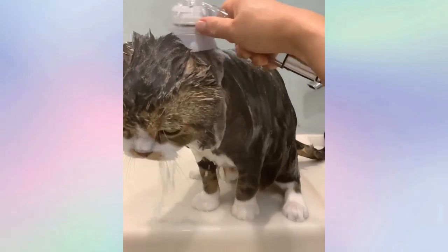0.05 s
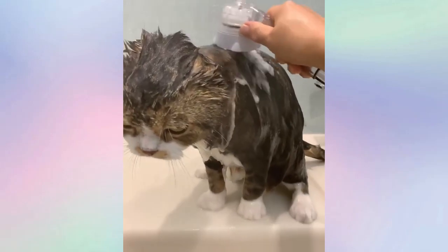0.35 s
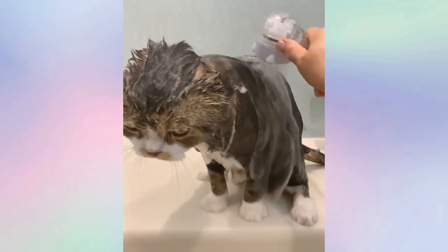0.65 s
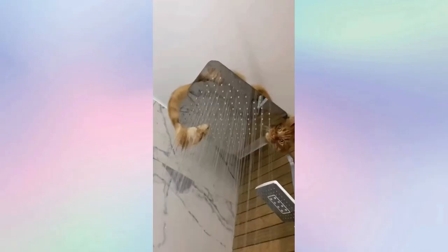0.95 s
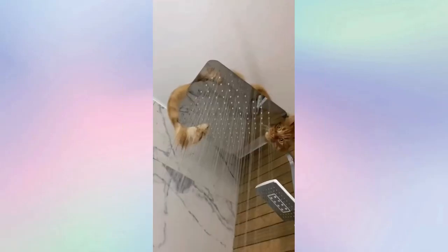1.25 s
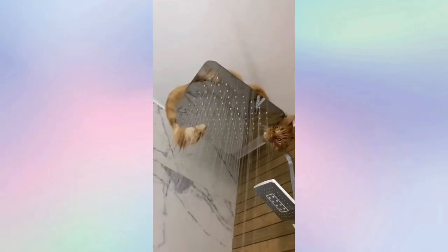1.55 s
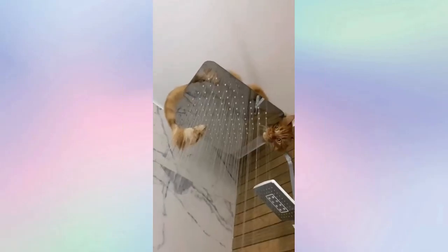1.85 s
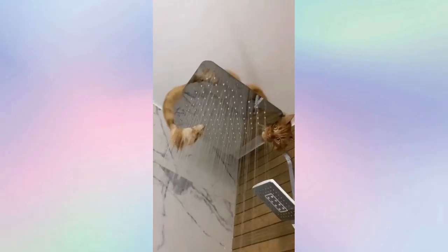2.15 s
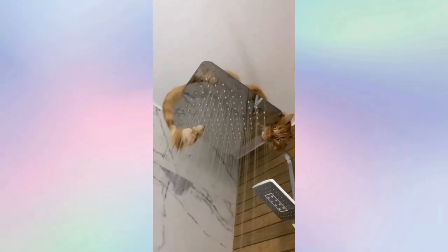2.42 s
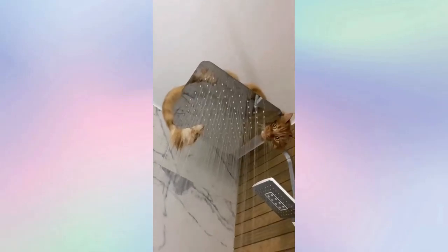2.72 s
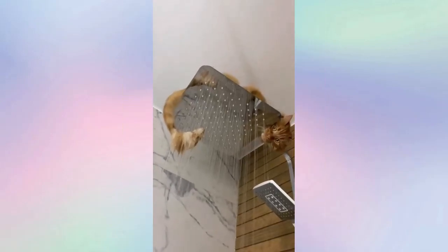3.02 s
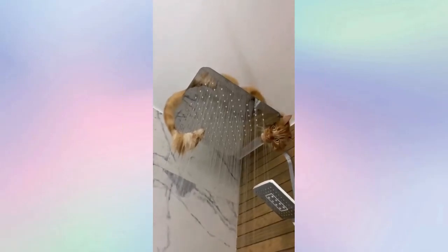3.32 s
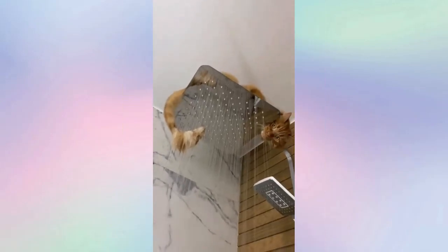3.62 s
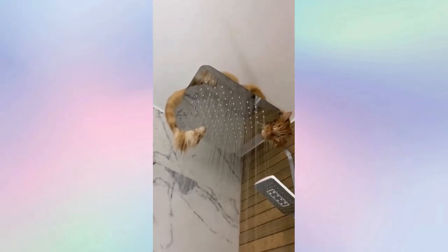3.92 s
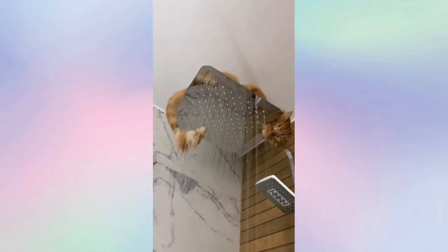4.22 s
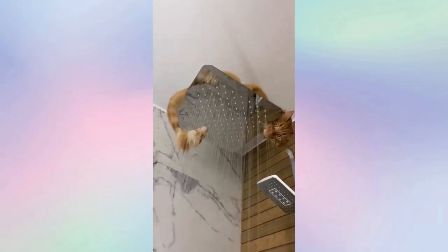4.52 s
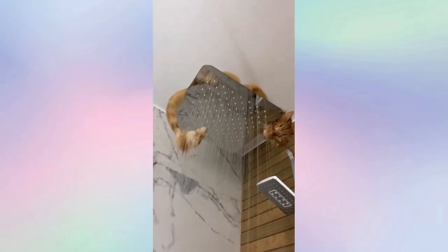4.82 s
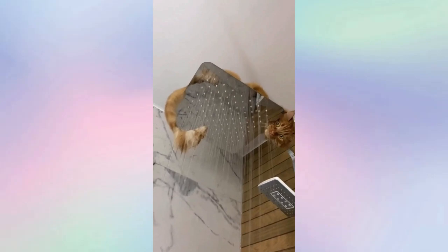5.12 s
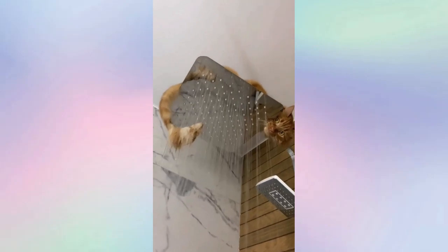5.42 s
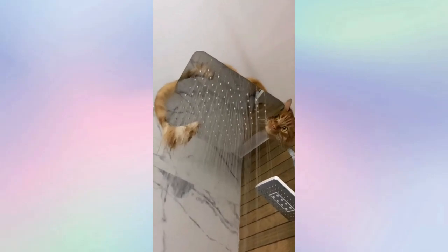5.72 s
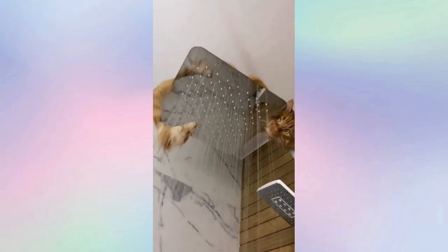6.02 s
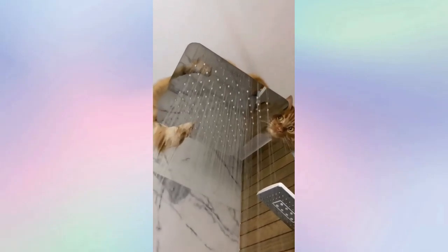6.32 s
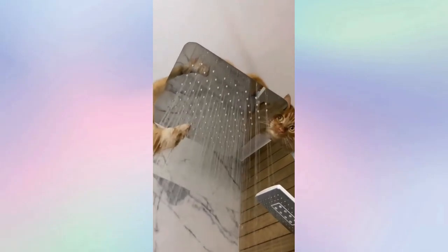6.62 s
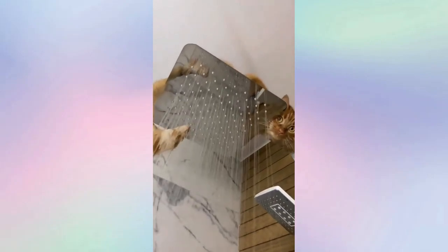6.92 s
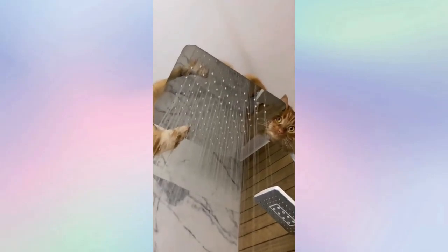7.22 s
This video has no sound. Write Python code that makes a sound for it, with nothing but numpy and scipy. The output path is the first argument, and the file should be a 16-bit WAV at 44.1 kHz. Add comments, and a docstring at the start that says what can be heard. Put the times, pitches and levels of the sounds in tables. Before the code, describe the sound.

A handheld sprayer hisses close by on a cat's wet fur while the run-off drums in a sink. It stops dead after about half a second, and one dry tick sounds in the short silence. Then an overhead shower cuts in and runs steadily, with bright spray, dense patter on the floor and small splashes in standing water. The bathroom stall rings hollow underneath, with a low boom and soft thuds.

```python
"""Two showers in turn

A hand sprayer hisses over a cat's back while the run-off drives the resonances of a sink. After a short
silence with one tick, an overhead shower rains on a bathroom floor. Its many drop impacts add up to
a surging noise, and air bubbles trapped in the standing water ring as small oscillators. Beneath them
the falling water excites the modes of floor and stall: a hollow ring, a low boom and soft thuds."""
import sys
import numpy as np
from scipy import signal
from scipy.fft import rfft, irfft, next_fast_len
from scipy.io import wavfile
from scipy.ndimage import uniform_filter1d, map_coordinates

SR = 44100
rng = np.random.default_rng(int(sys.argv[2]) if len(sys.argv) > 2 else 0)


def int16_out(signal):
    """Quantize to a 16-bit WAV file."""
    q = np.round(np.clip(np.atleast_2d(signal).T, -1, 1) * 32767)
    wavfile.write(sys.argv[1], SR, q.astype(np.int16))


N = 324576
SPRAYER_END_S, SHOWER_START_S = 0.567, 0.8215

# Levels in the tables are relative; each source adds its own gain.
# flow of the overhead shower: (time [s], patter level [dB], spray level [dB])
SHOWER_FLOW = [(0.83, -36, -35), (1.03, -34.5, -36), (1.05, -34, -31.5), (1.44, -34, -33), (1.48, -38, -34),
               (1.55, -33.5, -33), (1.68, -35.5, -32.5), (2.06, -32.5, -32), (2.26, -37, -32.5),
               (2.33, -32, -31.5), (2.39, -36.5, -33), (3.04, -35.5, -33.5), (3.11, -35, -34.5),
               (3.3, -31.5, -30.5), (3.31, -34, -31), (3.84, -34.5, -31), (3.87, -35, -34),
               (4.22, -34, -30), (4.24, -37.5, -33), (4.33, -36, -35.5), (4.71, -32, -30),
               (4.76, -34.5, -34), (4.93, -34, -30.5), (4.98, -35.5, -33), (5.07, -34, -32.5),
               (5.87, -35, -33.5), (6.41, -35, -33.5), (6.76, -36.5, -33.5), (6.98, -33.5, -33),
               (7.05, -38, -33.5), (7.1, -34, -32), (7.34, -35.5, -31.5)]
# gushes into the puddle: (start [s], length [s], level [dB])
GUSHES = [(1.31, 0.031, -43), (1.37, 0.021, -46.5), (1.47, 0.056, -42.5), (1.87, 0.062, -43),
          (1.97, 0.045, -43.5), (2.18, 0.022, -41), (2.27, 0.063, -42), (2.68, 0.049, -48.5),
          (2.98, .03, -44), (3.43, 0.046, -43), (3.6, .02, -39.5), (3.7, 0.038, -47), (3.925, .02, -46),
          (3.98, .035, -46), (4.3, .045, -44.5), (4.67, 0.037, -44), (4.87, 0.085, -42), (5.13, .025, -49),
          (5.36, .02, -46), (5.55, 0.041, -42.5), (5.79, 0.03, -45), (6.0, .03, -50), (6.29, 0.053, -51),
          (6.96, .02, -44), (7.27, 0.022, -42)]
# flow of the hand sprayer: (time [s], jet level [dB], fur level [dB], sink level [dB])
SPRAYER_FLOW = [(0.0, -39, -52, -33), (0.022, -39.5, -48.5, -37), (0.238, -39, -50, -36.5),
                (0.39, -36.5, -39.5, -34.5), (0.432, -39, -41, -35.5), (0.56, -36.5, -39.5, -35.5)]
# impulses of the tick's two edges and of heavy lumps of water: (time [s], level [dB])
TICK_EDGES = [(0.681, -36), (0.6824, -16.5)]
THUD_BLOWS = [(1.145, 17.5), (1.581, 13), (1.86, 13.5), (2.082, 14), (2.228, -3), (2.44, 14), (2.788, 12),
              (3.3, 13), (3.588, 15), (4.298, 16.5), (5.129, 16), (5.318, 5), (6.732, -4)]
# spectral envelopes: (frequency [Hz], level [dB])
SPRAY_SPECTRUM = [(2500, -17.5), (5000, -17), (7200, -42), (8500, -2.5), (9400, -4.5), (10000, -2.5),
                  (12400, 1.5), (13100, -3.5)]
PATTER_SPECTRUM = [(700, -38), (1850, -12), (2450, -10), (2800, -9), (3400, -2), (4400, -1.5), (6000, -0.5),
                   (7300, -3), (9000, -1), (13000, -11.5)]
PUDDLE_SPECTRUM = [(500, -18), (1200, -6.5), (1550, -2), (1900, -8.5), (2400, -3), (2800, -2), (3300, 1),
                   (4200, -1), (9000, -45)]
GUSH_SPECTRUM = [(700, -26), (1300, -5.5), (1550, -4.5), (1950, -3.5), (2450, 4), (3200, -12), (5000, -24)]
JET_SPECTRUM = [(1500, -29), (3200, -13), (4000, -3), (5100, -7.5), (6200, 1.5), (8000, 0.5), (10300, 3),
                (11500, -4.5), (12400, -5), (13100, -19.5)]
FUR_SPECTRUM = [(20, -19.5), (60, -0.5), (500, -12), (1300, -1), (2300, 6), (4000, 6), (5200, -1.5),
                (9000, -30)]
WASH_SPECTRUM = [(20, -39), (45, -37), (65, 7), (160, 8), (450, 3), (700, 3.5), (1000, 4), (1500, -9),
                 (3000, -13)]
TICK_SPECTRUM = [(200, -26), (2000, -11), (5000, 1.5), (13000, -8)]
SOFT_CONTACT = [(70, -5), (140, -10), (213, 2), (270, -18), (400, -50), (2000, -50)]
# normal modes: (frequency [Hz], bandwidth [Hz], level [dB])
SINK_MODES = [(89, 18, 1), (195, 21, -8), (264.3, 11, 1), (299, 38, -3), (347.6, 12, -1), (386.3, 14, 1.5),
              (465, 11, 0.5), (509, 10, -15.5), (640, 60, -12), (834, 33, -23)]
FLOOR_MODES = [(614, 6, 1.2), (680, 25, -9.5), (742, 13, 2.5), (783, 35, -10), (900, 54, -23)]
STALL_MODES = [(71, 5, -2), (97, 9, -16), (116, 3, -3), (138, 5, -2), (213, 7, 4), (240, 13, 2.5),
               (303, 11, -6.5), (360, 14, -8), (388, 5, -5)]
# tones that the water sustains: (frequency [Hz], wander [Hz], level [dB])
SINK_TONES = [(260, 6, -10), (346, 6, -7.5)]
STALL_TONES = [(116, 0.8, -69), (214, 2.5, -57.5)]
STALL_LOW_TONE = [(70.5, 1.2, -61.5)]
# swell of the sink's tones as run-off gathers, and of the stall's low tone: (time [s], level [dB])
SINK_TONE_SWELL = [(0.05, -12), (0.22, 1), (0.55, 3)]
LOW_TONE_SWELL = [(0.85, 0.5), (1.85, -3), (5.35, 5), (5.45, -8), (6.3, -10), (7.0, 1)]
# likeness of left and right: (frequency [Hz], coherence [0 to 1])
SINK_COHERENCE = [(100, 1), (350, 0.96), (700, 0.44), (2200, 0.34), (5000, 0.51), (13000, 0.17)]
STALL_COHERENCE = [(100, 0.95), (240, 0.96), (380, 0.68), (720, 0.49), (1300, 0.033), (2400, 0.55),
                   (3600, 0.33), (5500, 0.47), (7200, 0.42), (9000, 0.58), (13000, 0.51)]


def overhead_shower():
    """Superposition of random impacts: drops land in clumps, throw up spray and stir the puddle."""
    patter_db, spray_db = curves(SHOWER_FLOW)
    surge = clumps(per_s=90, fade_s=0.036)  # the same lumps drive all three layers
    # near drops stay distinct; the tiled walls blur the rest into a rush
    mist = amp(-7) * impacts(per_s=11000, spread_db=0.5) + rush(patchy_db=6.5)
    drops = amp(-8) * impacts(per_s=8000, spread_db=3.2) + rush(patchy_db=6)
    sizzle = bubbles(count=4500, pitch_hz=4000, scatter=.3, cycles=70, rise=.003, spread_db=1.5)
    plinks = bubbles(count=1900, pitch_hz=2650, scatter=.17, cycles=52, rise=.004, spread_db=2)
    wet_drops = unit(drops + amp(-12) * sizzle)
    pool = unit(amp(-2) * plinks + rush(patchy_db=14) + amp(-12) * impacts(per_s=1400, spread_db=1.5))
    spray = stereo(coloured(mist, SPRAY_SPECTRUM), STALL_COHERENCE)
    patter = stereo(coloured(wet_drops, PATTER_SPECTRUM), STALL_COHERENCE)
    puddle = stereo(coloured(pool, PUDDLE_SPECTRUM), STALL_COHERENCE)
    return (amp(spray_db + 0.07 + 0.8 * surge) * spray
            + amp(patter_db + 3.5 + 0.6 * surge) * patter
            + amp(-41 + 1.5 * wobble(per_s=12) + 0.41 * surge) * puddle)


def gushes():
    """Air entrainment: now and then a thicker stream slaps the puddle and churns up bubbles."""
    churn = bubbles(count=3000, pitch_hz=1950, scatter=.22, cycles=32, rise=.008, spread_db=1.5)
    slaps = rush(patchy_db=10) + amp(-8) * impacts(per_s=1500, spread_db=2)
    slosh = unit(unit(coloured(slaps, GUSH_SPECTRUM)) + unit(coloured(churn, GUSH_SPECTRUM)))
    return swells(GUSHES, attack_s=0.0073, release_s=0.019) * stereo(slosh, STALL_COHERENCE)


def hand_sprayer():
    """Broadband impact noise: fine jets hiss on wet fur, louder as they move along the back."""
    jet_db, fur_db, _ = curves(SPRAYER_FLOW)
    droplets = impacts(per_s=4000, spread_db=2.5)
    jets = unit(rush(patchy_db=5) + amp(-4.5) * droplets)
    hiss_gain = amp(jet_db + 5.5 + 1.5 * wobble(per_s=40))
    hiss = stereo(coloured(jets, JET_SPECTRUM), SINK_COHERENCE)
    fur = stereo(coloured(rush(patchy_db=7), FUR_SPECTRUM), SINK_COHERENCE)
    return hiss_gain * hiss + amp(fur_db + 4) * fur


def sink():
    """Forced vibration: the run-off drums on the sink's modes and builds up two sustained tones."""
    _, _, sink_db = curves(SPRAYER_FLOW)
    drumming = stereo(ringing(impacts(per_s=2500, spread_db=0), SINK_MODES), SINK_COHERENCE)
    tones = amp(curves(SINK_TONE_SWELL)[0]) * drone(SINK_TONES)
    return amp(sink_db + 1.1) * (drumming + tones)


def tick():
    """A short impulse has a broad spectrum: two close edges make one dry tick, mostly on the left."""
    left_right = amp([[4], [-4]])
    return left_right * coloured(impulses(TICK_EDGES), TICK_SPECTRUM)


def floor_ring():
    """Modal resonance: the wet floor rings hollow, each mode swaying as the streams wander over it."""
    modes = sum(amp(1.1 * wobble(per_s=5)) * ringing(impacts(per_s=2500, spread_db=0.5), [mode])
                for mode in FLOOR_MODES)
    growth_db_per_s = 0.15
    return amp(-51.3 + growth_db_per_s * np.arange(N) / SR) * stereo(modes, STALL_COHERENCE)


def stall():
    """Forced and free vibration: drops keep the stall booming over a dull wash; heavy lumps thud."""
    thuds = coloured(ringing(impulses(THUD_BLOWS), STALL_MODES), SOFT_CONTACT)
    boom_gain = amp(-50 - 1.5 * wobble(per_s=2.87))
    boom = stereo(ringing(impacts(per_s=2500, spread_db=0.5), STALL_MODES), STALL_COHERENCE)
    wash = amp(-54.5) * stereo(coloured(rush(patchy_db=4.5), WASH_SPECTRUM), STALL_COHERENCE)
    low_tone = amp(curves(LOW_TONE_SWELL)[0]) * drone(STALL_LOW_TONE)
    return boom_gain * boom + low_tone + drone(STALL_TONES) + thuds + wash


def impacts(per_s, spread_db):
    """Shot noise: two streams of drop impacts at random moments, a few big among many small."""
    size = amp(spread_db * np.clip(rng.standard_normal((2, N)), -2, 2))
    lands = rng.random((2, N)) < per_s / SR
    return unit(lands * size * rng.choice([-1, 1], (2, N)))


def bubbles(count, pitch_hz, scatter, cycles, rise, spread_db):
    """Bubble resonance: trapped air rings as a damped oscillator, rising in pitch near the surface."""
    when, bearing = rng.random((count, 2)).T
    tune, size = np.clip(rng.standard_normal((count, 2)), -2, 2).T
    n = np.arange(SR // 20)
    turns = pitch_hz * np.exp(scatter * tune)[:, None] * n / SR
    age = turns / cycles  # in decay times
    envelope = amp(spread_db * size)[:, None] * (np.exp(-age) - np.exp(-10 * age))
    ring = envelope * np.sin(2 * np.pi * turns * (1 + rise * np.minimum(age, 2)))
    samples = ((when * N).astype(int)[:, None] + n).ravel()
    shares = np.cos(2 * np.pi * bearing), np.sin(2 * np.pi * bearing)
    pair = [np.bincount(samples, (ring * share[:, None]).ravel(), N)[:N] for share in shares]
    return unit(np.array(pair))


def rush(patchy_db):
    """Spectral modulation: two noises in which narrow streaks of pitch swell and fade."""
    spectra = signal.stft(rng.standard_normal((2, N)), nperseg=1024)[2]
    field = rng.standard_normal(spectra.shape[1:])
    for axis in (0, 1):  # smooth over frequency, then time
        field = uniform_filter1d(field, size=4, axis=axis)
    streaks = np.minimum(unit(field), .7)
    return unit(signal.istft(spectra * amp(patchy_db * streaks), nperseg=1024)[1][:, :N])


def clumps(per_s, fade_s):
    """Poisson process: lumps of water land and their spatter fades, giving a swing of rms 1."""
    lumps = 1. * (rng.random(N) < per_s / SR)
    swing = signal.lfilter([1], [1, -np.exp(-1 / (fade_s * SR))], lumps)
    return unit(swing - swing.mean())


def drone(tones):
    """Sustained resonance: tones fed by the water without a break waver in level and pitch."""
    total = np.zeros(N)
    for hz, wander_hz, db in tones:
        peak = np.sqrt(2) * amp(db + 1.8 * wobble(per_s=8))
        pitch_hz = hz + wander_hz * wobble(per_s=14)
        total += peak * np.sin(2 * np.pi * np.cumsum(pitch_hz) / SR)
    return total


def ringing(x, modes):
    """Modal superposition: x drives a body whose modes respond as damped oscillators."""
    return filtered(x, lambda hz: sum(
        amp(db) * 1j * hz * width / (centre ** 2 - hz ** 2 + 1j * hz * width)
        for centre, width, db in modes))


def impulses(rows):
    """Ideal impulses: each blow lasts one sample."""
    blows = np.zeros(N)
    for time_s, db in rows:
        blows[round(time_s * SR)] = amp(db)
    return blows


def swells(rows, attack_s, release_s):
    """Amplitude envelope: each gush rises linearly, holds and decays exponentially."""
    t = np.arange(N) / SR
    gain = np.zeros(N)
    for start_s, length_s, db in rows:
        attack = np.clip(1 + (t - start_s) / attack_s, 0, 1)
        release = np.exp(-np.maximum(t - start_s - length_s, 0) / release_s)
        gain += amp(db) * attack * release
    return gain


def treble_opening(x, at_s, over_s):
    """Crossfade from a low-passed copy: the top of the treble comes in after the rest."""
    dull = low_pass(x, cutoff_hz=10200, edge_hz=600)
    opened = np.clip((np.arange(N) / SR - at_s) / over_s, 0, 1)
    return dull + opened * (x - dull)


def stereo(pair, coherence):
    """Partial coherence: two unrelated signals, as mid (rms 1) and side, form left and right."""
    def weights(hz):
        angle = np.arccos(np.clip(along(coherence, hz), -1, 1)) / 2
        return np.array([np.cos(angle), np.sin(angle)])
    mid, side = filtered(pair, weights)
    return np.array([mid + side, mid - side]) / np.std(mid)


def coloured(x, spectrum):
    """Source and filter: x is weighted by a spectral envelope."""
    return filtered(x, lambda hz: amp(along(spectrum, hz)))


def low_pass(x, cutoff_hz, edge_hz):
    """Low-pass filtering: the gain falls linearly to zero across the edge."""
    return filtered(x, lambda hz: np.clip((cutoff_hz - hz) / edge_hz + .5, 0, 1))


def filtered(x, response):
    """Convolution theorem: the spectrum of x is multiplied by a frequency response."""
    size = next_fast_len(N + SR // 2)
    return irfft(rfft(x, size) * response(np.fft.rfftfreq(size, 1 / SR)), size)[..., :N]


def wobble(per_s):
    """Spline interpolation: a smooth curve through random knots."""
    knots = rng.standard_normal(int(N * per_s / SR) + 4)
    return map_coordinates(knots, [np.arange(N) * per_s / SR])


def curves(rows):
    """Linear interpolation: one value per sample for each column after the time."""
    times, *columns = np.transpose(rows)
    return [np.interp(np.arange(N) / SR, times, column) for column in columns]


def along(points, hz):
    """Interpolation on a logarithmic frequency axis."""
    knots_hz, values = np.transpose(points)
    return np.interp(np.log(hz + 1), np.log(knots_hz + 1), values)


def amp(db):
    """Amplitude ratio from decibels."""
    return 10 ** (np.asarray(db) / 20)


def unit(x):
    """Normalisation to rms 1."""
    return x / np.sqrt(np.mean(x ** 2) + 1e-20)


def scene():
    """Gating and superposition: the sprayer stops dead, a tick sounds, the shower cuts in."""
    t = np.arange(N) / SR
    since_stop = np.maximum(t - SPRAYER_END_S, 0)
    short_tail = amp(-24.5) * np.exp(-since_stop / 0.0058)
    sprayer_gate = np.maximum(np.exp(-since_stop / .0008), short_tail)
    shower_gate = np.clip((t - SHOWER_START_S) / 0.00095, 0, 1)
    cat_wash = hand_sprayer() + sink()
    shower = treble_opening(overhead_shower(), at_s=1.01, over_s=0.03)
    bathroom = shower + gushes() + floor_ring() + stall()
    return sprayer_gate * cat_wash + tick() + shower_gate * bathroom


def record(dry):
    """Band limiting: the highest treble is cut off."""
    return low_pass(dry, cutoff_hz=13200, edge_hz=300)


dry = scene()
out = record(dry)
int16_out(out)
```